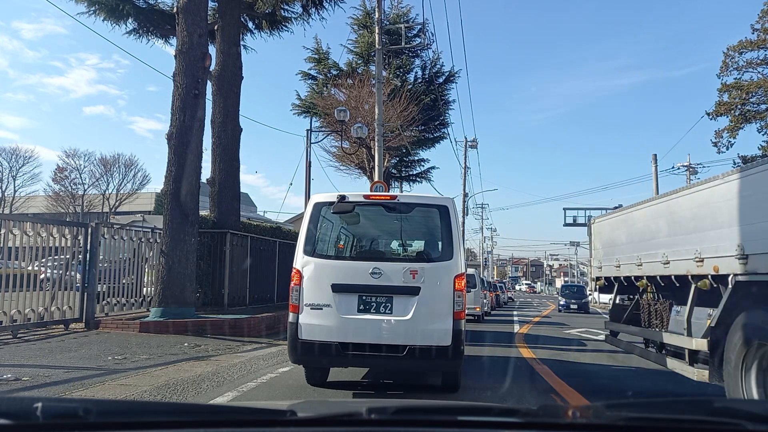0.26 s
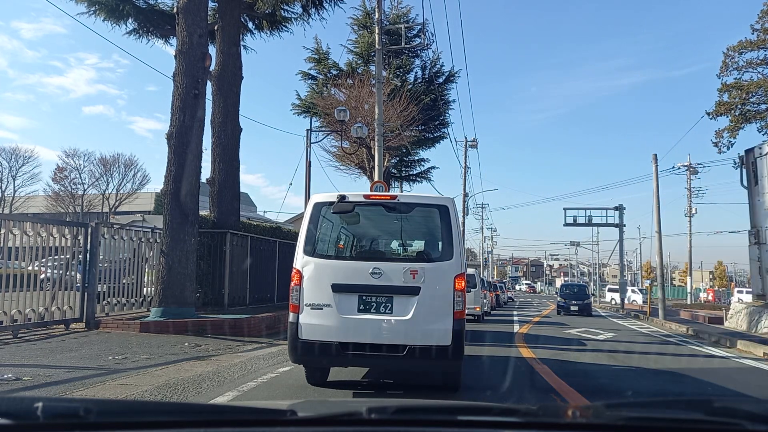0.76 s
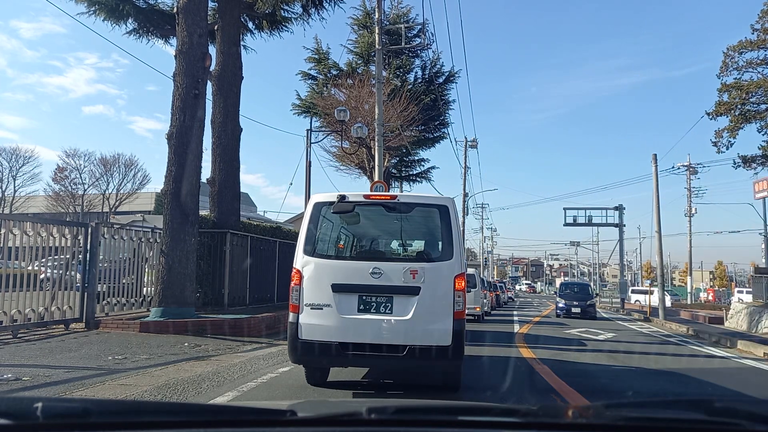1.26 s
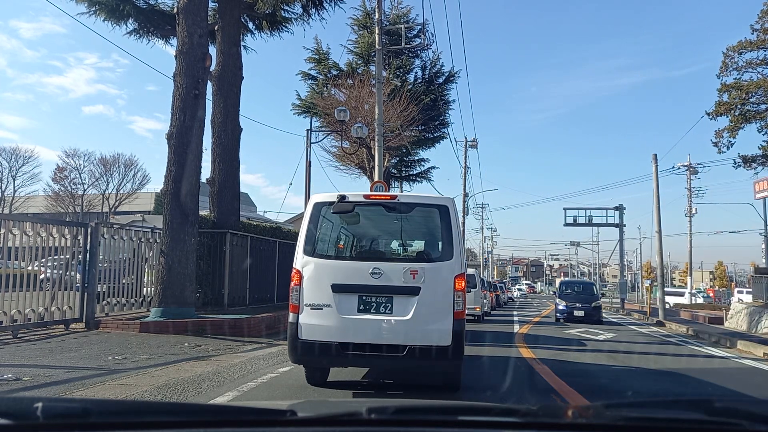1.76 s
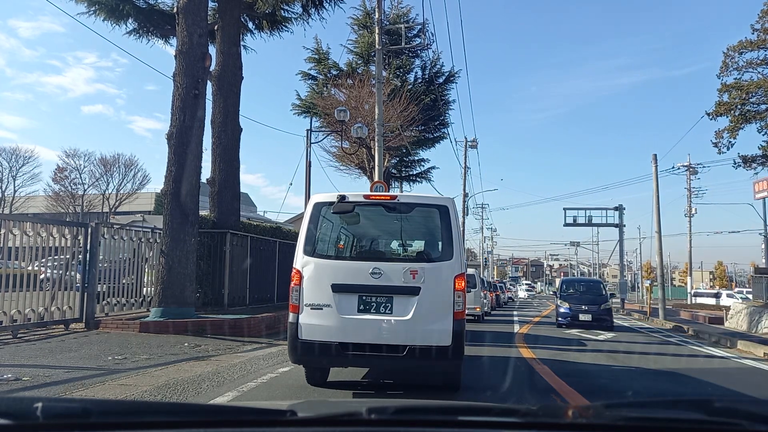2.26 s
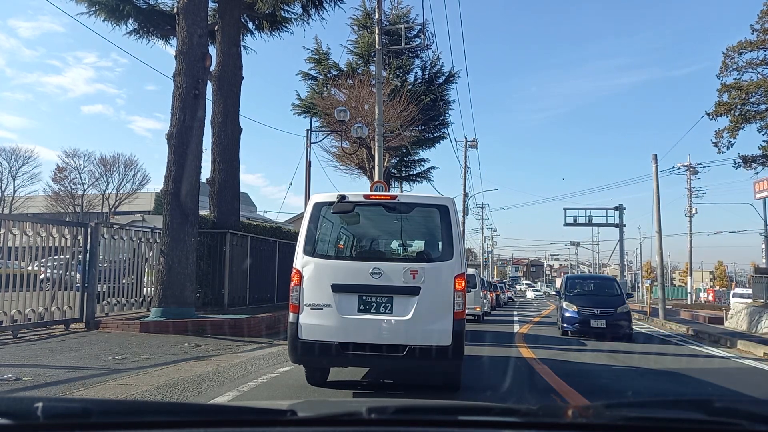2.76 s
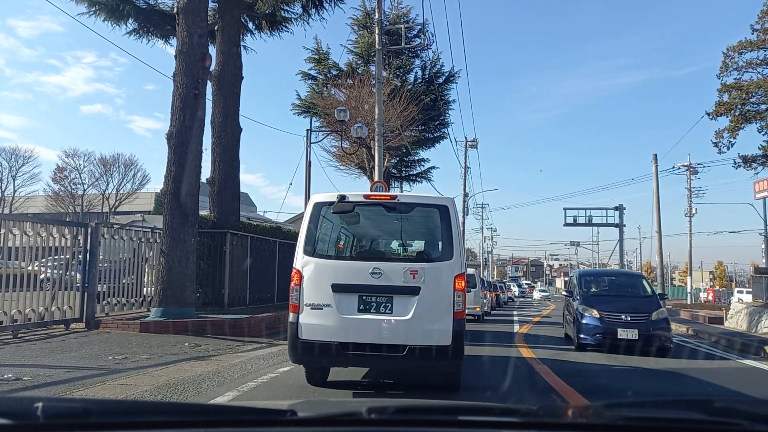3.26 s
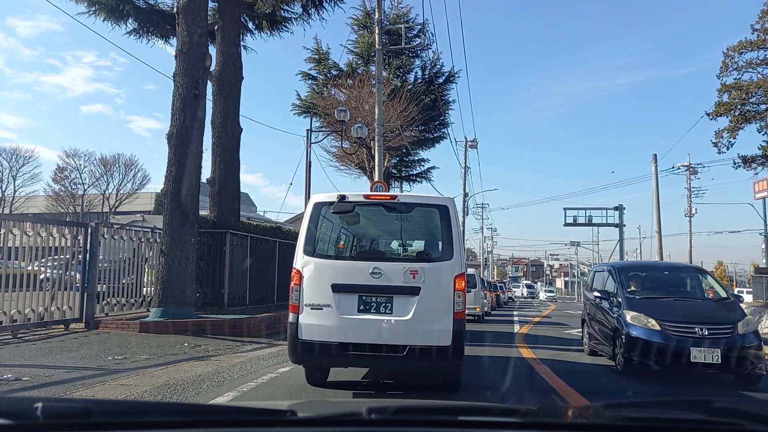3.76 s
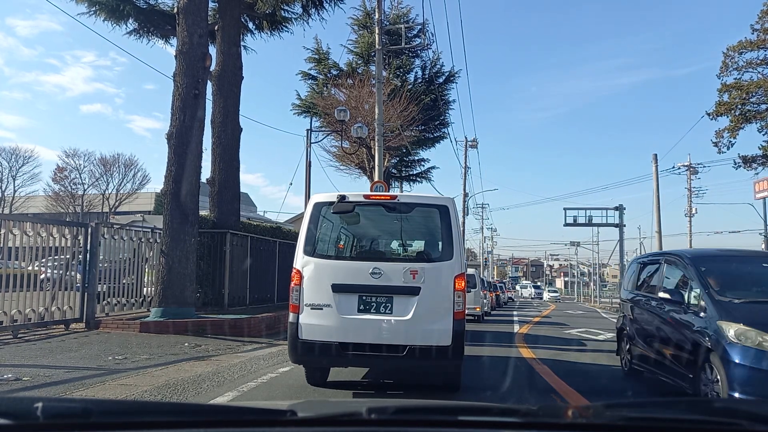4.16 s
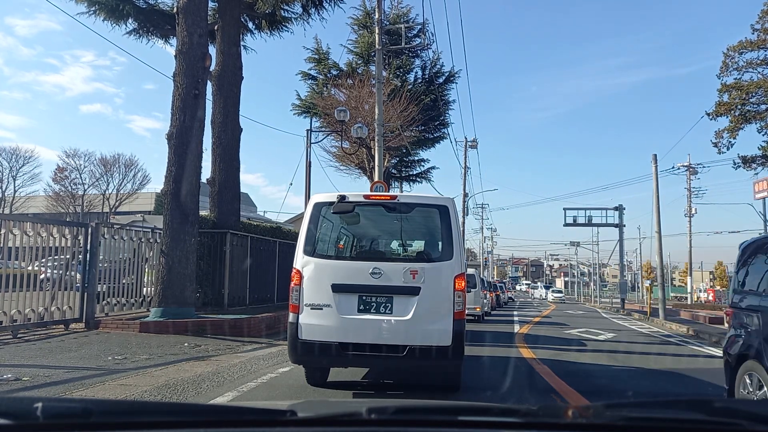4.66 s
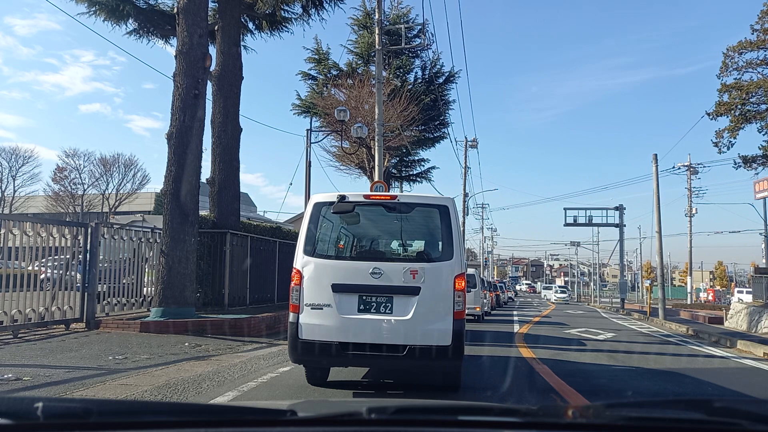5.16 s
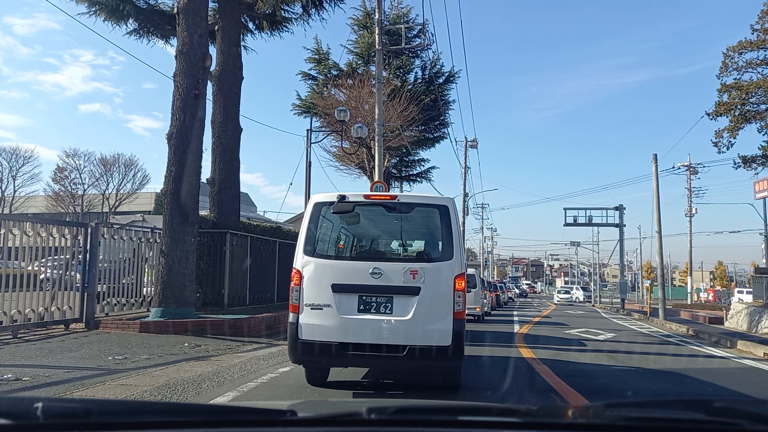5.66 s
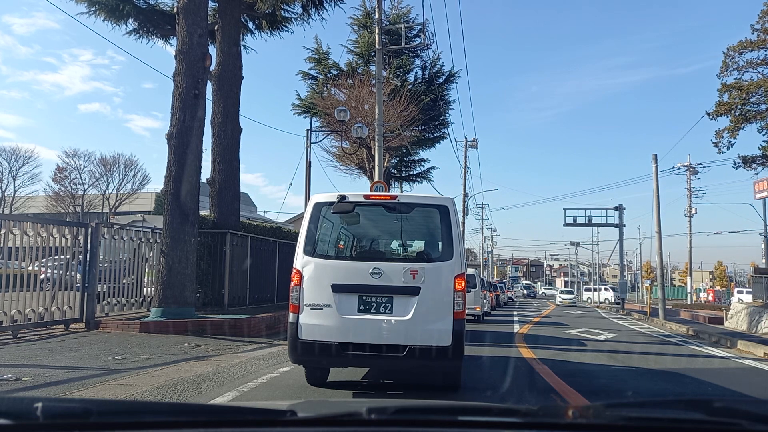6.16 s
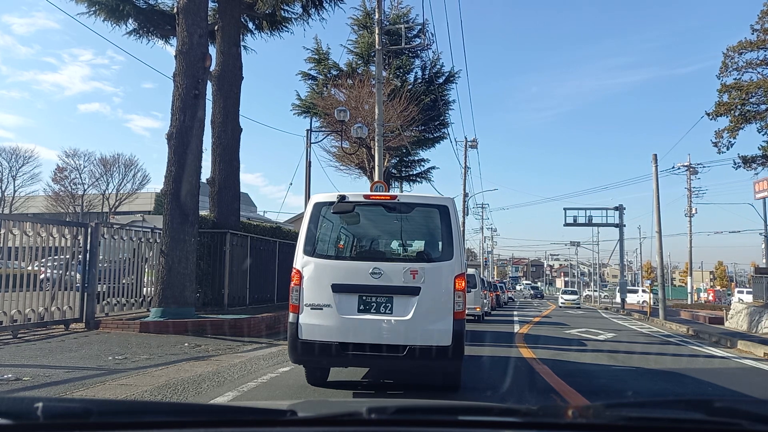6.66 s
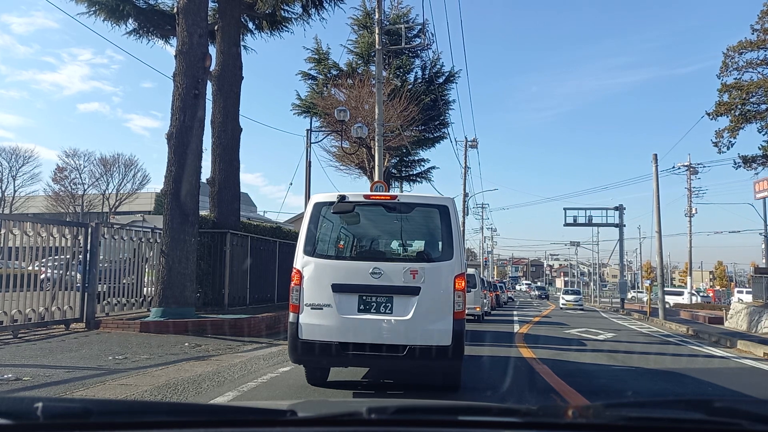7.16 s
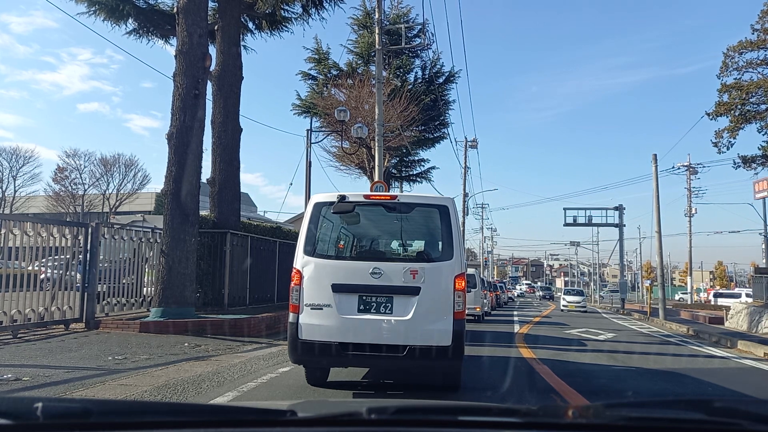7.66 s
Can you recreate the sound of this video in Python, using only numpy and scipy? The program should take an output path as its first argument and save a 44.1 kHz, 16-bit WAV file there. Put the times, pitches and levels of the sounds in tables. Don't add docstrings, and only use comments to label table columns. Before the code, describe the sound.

The listener sits in a closed, stationary car with the engine idling. At 0 s a lorry is already alongside: a nearly pure low drone around 50 Hz, heavy shell boom and rumble, muffled tyre roar, with much fainter clatter, chain jingle and air hiss through the glass. A big soft boom lands at 0.07 s, with lesser knocks near 0.5 and 0.8 s. The drone is strong around 0.75 s; from 1.0 to 1.7 s the rumble swells again with several thumps and a cluster of dry panel rattles. By 2.1 s it drops sharply. Sparse fading rattles last until 3.4 s, with a tiny high brake squeak at 2.8 s and dull thumps at 3.1, 3.7 and 3.9 s. Afterwards low cabin wash, uneven idle hum, a small dash motor and gentle vent air remain, the distant drone rising in pitch and briefly returning near 6 s, until about 7.9 s.

```python
import sys
import numpy as np
from scipy import signal
from scipy.io import wavfile
from scipy.ndimage import uniform_filter1d

SR = 44100
rng = np.random.default_rng(int(sys.argv[2]) if len(sys.argv) > 2 else 0)


def field_ratio(decibels):
    return 10 ** (np.asarray(decibels, dtype=float) / 20)


def wav_record(signal):
    frames = np.transpose(np.atleast_2d(signal))
    bounded = np.clip(frames, -1, 1)
    quanta = np.round(bounded * 32767).astype(np.int16)
    wavfile.write(sys.argv[1], SR, quanta)


N = 348390

# [t/s, f/Hz, level/dB]
LORRY_FIRING = [(0, 51.4, -33.5), (.25, 51.27, -32.5), (.75, 49.88, -23), (1.1, 49.46, -29),
                (1.5, 49.08, -25.5), (2, 48.9, -35), (2.75, 50.04, -37), (3, 50.87, -35),
                (3.75, 52.17, -42.5), (4.5, 55.27, -43), (5.2, 56.8, -50), (5.7, 57.55, -39.5),
                (5.98, 60.33, -33), (6.2, 60.5, -58), (6.42, 60.2, -37), (6.75, 59.66, -54.5),
                (7.7, 60.2, -40), (7.9, 58.9, -42)]
# [multiple of the firing rate, level/dB]
LORRY_HARMONICS = [(1, -0.5), (2, -15), (3, -28), (4, -27)]
# [t/s, level over the nearest pass/dB]
NEARNESS = [(0, -5), (.8, -4), (1.2, -2.5), (1.4, -3.5), (1.6, -1), (2.1, -10), (2.8, -9.5), (3.6, -13),
            (4.8, -14.5), (7.9, -16)]
# [t/s, level over the start/dB]
FLANK_FACING = [(0, 2), (.4, -3), (.95, -5), (1.42, -5), (1.53, -2), (2.02, -16.5), (2.8, -19.5),
                (5, -33.5), (7.9, -34)]
# [f/Hz, level per Hz/dB]
BOOM_COLOUR = [(36, -30), (44, -9), (54, -0.5), (64, 0), (80, 1.5), (100, -8), (140, -11), (170, -15),
               (220, -54.5)]
# [f/Hz, level per Hz/dB]
RUMBLE_COLOUR = [(76, -32), (130, -2), (167, -6.5), (190, -1), (212, 1), (238, -5), (285, -3), (339, -8),
                 (398, -11), (450, -17), (520, -22.5), (680, -52)]
# [f/Hz, level per Hz/dB]
ROAR_COLOUR = [(260, -29), (440, -3.5), (680, -9.5), (749, -7.5), (1010, -13), (1500, -23.5), (1700, -32),
               (2210, -57.5)]
# [f/Hz, level per Hz/dB]
CLATTER_COLOUR = [(820, -21), (1400, -3), (1520, -1), (2140, 0.5), (2600, -3.5), (2840, -1.5), (3250, -1.5),
                  (3700, -9), (4150, -12.5), (4350, -25), (5980, -45)]
# [f/Hz, level per Hz/dB]
JINGLE_COLOUR = [(3900, -29.5), (4300, -4), (4700, 1), (5000, 0), (5500, -5.5), (6500, -10.5), (7300, -27)]
# [t/s, peak level/dB, hold/s]
CHAIN_SWINGS = [
    (.01, -77, .05),
    (.19, -77.5, 0.12),
    (1.11, -82, .02),
    (1.17, -83.5, 0.094),
    (1.5, -83.5, 0.082),
    (1.655, -87.5, .06),
    (1.93, -94, .03),
    (2.405, -90, .03),
]
# [f/Hz, level per Hz/dB]
AIR_COLOUR = [(5000, -34.5), (5800, -12.5), (6860, -8.5), (7500, -10.5), (7900, -3), (8260, 4), (8800, -2),
              (9300, -7.5), (10050, -5.5), (10600, -14.5), (13000, -15.5)]
# [t/s, peak level/dB, hold/s]
AIR_PUFFS = [
    (0, -78, .05),
    (.04, -72.5, 0.17),
    (.3, -89.5, 0.15),
    (1.235, -86.5, 0.032),
    (1.43, -87.5, .06),
    (1.5, -86.5, 0.16),
    (2.76, -85, 0.16),
    (4.5, -100, 0.61),
    (5.75, -90, 0.29),
    (6.35, -94, 0.22),
]
# [multiple of the crank rate, level/dB]
IDLE_HARMONICS = [(2, -55.5), (3, -63), (4, -50), (5, -49), (6.15, -53)]
# [multiple of the first one's shaft rate, level over the
# whine/dB, left-right/dB, left leads/rad]
MOTOR_TONES = [(1.385, 18.5, 1, 0.22), (2, 8.5, -3, 0.15), (2.785, 10, 2.5, 0.3), (3, 11, -0.5, 0.27),
               (3.87, 5, -0.5, 0.34), (13, -2.5, 1, 0.71), (14, 3, -5, 3.34)]
# [t/s, level/dB]
MOTOR_SWELL = [(0, 4), (1.3, 0.5), (1.8, 4), (2.5, -0.5), (3.6, 6.5), (4.2, -6), (4.6, 1), (6.4, -1.5),
               (7.2, 3), (7.9, -0.5)]
# [f/Hz, level/dB]
WHISTLES = [(8247, -107), (8452, -104), (9749, -107), (10024, -104), (10110, -106)]
# [f/Hz, level per Hz/dB]
CABIN_COLOUR = [(12, -39.5), (26, -38.5), (36, -26.5), (59, 1), (86, 0), (158, -20), (205, -5.5),
                (268, -28.5), (328, -11.5), (444, -27.5), (616, -21.5), (971, -31.5), (1450, -43.5),
                (1650, -43)]
# [f/Hz, level per Hz/dB]
VENT_COLOUR = [(880, -33.5), (1250, -4), (1400, 2), (1560, -5), (1680, -9.5), (2100, -14), (3200, -19.5),
               (4150, -22.5), (4500, -23.5), (7500, -38), (9750, -62.5)]
# [t/s, peak level/dB, f/Hz, time to fade 60 dB/s]
ROAD_BUMPS = [
    (0.071, -20, 134, 0.41),
    (0.469, -41.5, 502, 0.34),
    (0.829, -36.5, 470, 0.19),
    (1.02, -32.5, 205.4, 0.54),
    (1.25, -30.5, 143.4, .6),
    (1.379, -28, 67.4, 0.89),
    (1.505, -33.5, 394, 0.38),
    (3.1, -33, 209.7, 0.58),
    (3.661, -28, 89.6, 0.49),
    (3.92, -37.5, 199.4, 0.39),
]
# [t/s, peak level/dB, lower ring when struck f/Hz, upper ring level/dB, shaking lasts/s]
PANEL_RATTLES = [(0.996, -55, 3200, -12, 0.024), (1.12, -59, 2830, -10, 0.076),
                 (1.167, -53.5, 2770, 12.5, 0.05), (1.252, -52.5, 2990, -9, 0.023),
                 (1.291, -59, 2420, -1.5, 0.088), (1.33, -64, 2590, 14, 0.054),
                 (1.4142, -63, 2573, 13, 0.052), (1.5065, -55, 2570, 5, 0.039),
                 (1.5894, -59, 2770, 14, 0.094), (1.66, -64.5, 2700, 17.5, 0.16),
                 (1.841, -70, 3180, -5, 0.058), (1.923, -65, 3220, 16.5, 0.069),
                 (2.1846, -70, 2700, 10, 0.052), (2.405, -68, 2710, 14, 0.053),
                 (2.638, -65.5, 2800, -1, 0.062), (2.859, -72.5, 2997, 20, 0.082),
                 (2.964, -69.5, 2760, 10, 0.074), (3.358, -68, 3140, 15.5, 0.13)]
# [f/Hz, level per Hz/dB]
PREAMP_COLOUR = [(3240, -40), (5500, -11), (7450, -13.5), (7880, -12.5), (8120, -6.5), (8560, -5),
                 (9250, -8.5), (9870, -2), (11100, -1), (12300, 2.5), (15100, 0.5), (16500, -4.5)]
# [f/Hz, likeness 0-1]
PORT_LIKENESS = [(60, 0.99), (99, 0.93), (270, 0.91), (450, 0.52), (740, 0.44), (1220, 0.36), (2000, 0.17),
                 (3300, 0.093), (9000, 0.14), (15000, .01)]
# [f/Hz, lead/rad]
PORT_LEAD = [(30, 0.25), (400, 0.11), (690, 0.88), (1120, 4.05), (1460, 1.3), (1720, 4.2)]
# [f/Hz, left-right/dB]
PORT_TILT = [(60, -3), (92, 4), (140, 1.5), (210, 2), (330, 1.0), (500, 3.5), (770, 3.5), (1170, 4.5),
             (1790, 4), (2740, 2.5), (4190, -0.5), (6410, 0), (9810, -6), (15000, 4)]


def evened(x):
    return x / np.sqrt(np.mean(x ** 2) + 1e-20)


def read(points, hz):
    f, value = np.transpose(points)
    return np.interp(np.log(hz + 1), np.log(f + 1), value)


def curves(rows):
    s, *columns = np.transpose(rows)
    return [np.interp(np.arange(N) / SR, s, c) for c in columns]


def ports(left, right):
    return np.array([[left], [right]])


def drift(hz):
    t = np.arange(0, N + 200, 200) / SR
    rates = np.geomspace(hz / 20, hz, 20)
    waves = sum(np.sin(2 * np.pi * (f * t + rng.random())) / np.sqrt(f) for f in rates)
    return np.interp(np.arange(N) / SR, t, evened(waves))


def tone(hz, lead=0):
    turns = np.cumsum(hz) / SR + rng.random()
    return np.sqrt(2) * np.sin(2 * np.pi * turns + lead)


def noise(spectrum, patchy_db, size):
    frames, hz = 4 * N // size + 5, np.fft.rfftfreq(size, 1 / SR)
    a, b, c, d, patches = rng.standard_normal((frames, len(hz), 5)).T
    patches = evened(uniform_filter1d(uniform_filter1d(patches, 9, 0), 6, 1))
    same = np.clip(read(PORT_LIKENESS, hz), -1, 1)[:, None]
    lag = np.exp(-1j * read(PORT_LEAD, hz))[:, None]
    left = a + 1j * b
    right = same * lag * left + np.sqrt(1 - same ** 2) * (c + 1j * d)
    inside = (hz >= spectrum[0][0]) & (hz <= spectrum[-1][0])
    tilt_db = np.multiply.outer([.5, -.5], read(PORT_TILT, hz))[:, :, None]
    gain = field_ratio(read(spectrum, hz)[:, None] + patchy_db * patches + tilt_db) * inside[:, None]
    z = np.array([left, right]) * gain
    out = signal.istft(z, nperseg=size, noverlap=3 * size // 4)[1][:, :N]
    return out / np.std(out.mean(0))


def bursts(rows, rise_s, fade_db_per_s):
    t = np.arange(0, N / SR, .001)
    gain = np.zeros(len(t))
    for s, db, hold_s in rows:
        fade_db = fade_db_per_s * np.maximum(t - s - hold_s, 0)
        gain += np.clip((t - s) / rise_s, 0, 1) * field_ratio(db - fade_db)
    return np.interp(np.arange(N) / SR, t, gain)


def ring(x, hz, width_hz):
    turn = np.exp(2j * np.pi * np.cumsum(hz) / SR)
    r = np.exp(-np.pi * width_hz / SR)
    smooth = signal.lfilter([(1 - r) ** 2], [1, -2 * r, r * r], x / turn)
    return 2 * (turn * smooth).real * np.sqrt(SR / 2 / width_hz)


def passing_gain(db, near_share, facing_share):
    return field_ratio(db + near_share * curves(NEARNESS)[0] + facing_share * curves(FLANK_FACING)[0])


def lorry_engine():
    hz, db = curves(LORRY_FIRING)
    out = 0
    for k, harmonic_db in LORRY_HARMONICS:
        swell_db = 0.85 * (k > 1) * drift(1.2)
        out = out + field_ratio(db + harmonic_db + swell_db) * tone(k * hz, ports(.12, 0))
    return out


def shell_boom():
    boom = passing_gain(-31.5, 0.61, 0.094) * noise(BOOM_COLOUR, patchy_db=-1.56, size=8192)
    rumble = passing_gain(-32, 1, 0.017) * noise(RUMBLE_COLOUR, patchy_db=1.37, size=4096)
    return boom + rumble


def tyre_roar():
    return passing_gain(-48.5, 0.3, 0.21) * noise(ROAR_COLOUR, patchy_db=1.5, size=2048)


def flank_clatter():
    flank = passing_gain(-58, 0.01, 0.86) * field_ratio(0.99 * drift(25))
    return flank * noise(CLATTER_COLOUR, patchy_db=1.0, size=512)


def chain_jingle():
    swings = bursts(CHAIN_SWINGS, rise_s=.005, fade_db_per_s=150)
    gain = passing_gain(-82.5, 0.01, 0.8) + swings
    return gain * noise(JINGLE_COLOUR, patchy_db=3.0, size=512)


def air_hiss():
    puffs = bursts(AIR_PUFFS, rise_s=.012, fade_db_per_s=112)
    gain = passing_gain(-84, 0.39, 0.097) + puffs
    return gain * noise(AIR_COLOUR, patchy_db=0.5, size=512)


def idling_engine():
    crank_hz = 15.27 * (1 + 0.0053 * drift(1.53))
    out = 0
    for k, db in IDLE_HARMONICS:
        out = out + field_ratio(db + 0.12 * k * drift(1.6)) * tone(k * crank_hz, ports(.2, 0))
    return out


def dash_motors():
    whine_db = -73.5
    whine_hz = 1334.3 + 2 * drift(2)
    shaft_hz = whine_hz / 13
    swell_db = curves(MOTOR_SWELL)[0]
    out = 0
    for k, db, left_db, lead in MOTOR_TONES:
        level_db = whine_db + swell_db * (k > 10) + db + 2.1 * drift(7.3)
        out = out + field_ratio(level_db + ports(left_db / 2, -left_db / 2)) * tone(k * shaft_hz, ports(lead, 0))
    return out


def electric_whistles():
    out = 0
    for hz, db in WHISTLES:
        out = out + field_ratio(db + 2.8 * drift(4.8) + ports(-2.5, 2.5)) * tone(hz + 3 * drift(5))
    return out


def cabin_air():
    wash = field_ratio(-43.5) * noise(CABIN_COLOUR, patchy_db=1.0, size=8192)
    vents = field_ratio(-74) * noise(VENT_COLOUR, patchy_db=1.5, size=1024)
    return wash + vents


def bumps():
    out, t = np.zeros((2, N + SR)), np.arange(SR) / SR
    for s, db, hz, t60 in ROAD_BUMPS:
        swell = (1 - np.exp(-t * hz / 2.0)) * field_ratio(db - 60 * t / t60)
        out[:, round(s * SR):][:, :SR] += swell * np.sin(2 * np.pi * hz * t + ports(.15, 0))
    return out[:, :N]


def rattles():
    out, t = np.zeros((2, N + SR)), np.arange(SR // 2) / SR
    settled_hz, sag_s = 2690, .046
    scrape_band = signal.butter(3, [2300, 4300], "band", fs=SR, output="sos")
    for s, db, low_hz, high_db, lasts_s in PANEL_RATTLES:
        tick_db = 7.4 * np.exp(-t / 0.0087)
        sinking_db = tick_db - 28.0 * t - 170.0 * np.maximum(t - lasts_s, 0)
        shake = rng.standard_normal((2, len(t))) * np.minimum(t / 0.0053, 1)
        chatter_db = 3 * evened(uniform_filter1d(rng.standard_normal(len(t)), size=250))
        shake = shake * field_ratio(db + sinking_db + chatter_db)
        sag_hz = settled_hz + (low_hz - settled_hz) * np.exp(-t / sag_s)
        build = np.minimum(0.44 + t / .035, 1.3)
        lower = field_ratio(-6.5) * ring(shake * build, sag_hz, width_hz=350)
        high_hz = min(3300 + 260 * s, 3930)
        upper = field_ratio(high_db - 19.5 - 40 * t) * ring(shake, high_hz + 0 * t, width_hz=480)
        scrape = field_ratio(-60 * t) * signal.sosfilt(scrape_band, shake)
        out[:, round(s * SR):][:, :len(t)] += lower + upper + scrape
    glass = signal.butter(6, 4400, fs=SR, output="sos")
    return signal.sosfilt(glass, out[:, :N])


def squeak():
    start_s, lasts_s = 2.77, .15
    t = np.arange(N) / SR - start_s
    done = np.clip(t / lasts_s, 0, 1)
    gate = np.clip(np.minimum(t, lasts_s - t) / .015, 0, 1)
    hz = 7320 + 110 * (done - 2.5 * done ** 8)
    level_db = -89 - 6 * (0.5 - done) + 2.5 * drift(80)
    return field_ratio(level_db) * gate * tone(hz + 25 * drift(100), ports(1.5, 0))


def scene():
    lorry = lorry_engine() + shell_boom() + tyre_roar() + flank_clatter() + chain_jingle() + air_hiss()
    own_car = idling_engine() + dash_motors() + electric_whistles() + cabin_air()
    return lorry + own_car + bumps() + rattles() + squeak()


def roll_off(x):
    return signal.sosfilt(signal.butter(12, 15670, fs=SR, output="sos"), x)


def record(dry):
    fade_in = np.minimum(np.arange(N) / SR / .004, 1)
    preamp = field_ratio(-82) * noise(PREAMP_COLOUR, patchy_db=-1.0, size=1024)
    mix = fade_in * dry + preamp
    return roll_off(mix)


dry = scene()
out = record(dry)
wav_record(out)
```